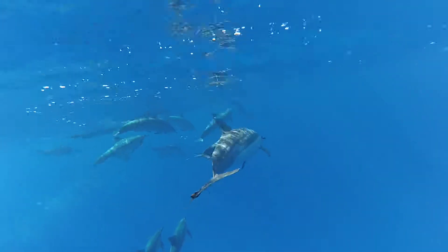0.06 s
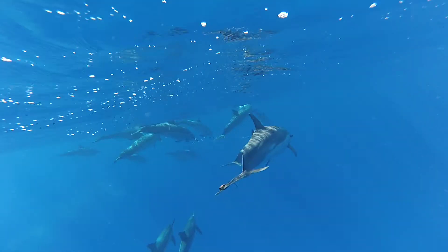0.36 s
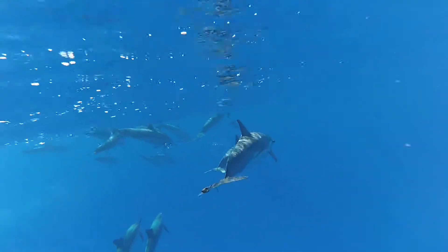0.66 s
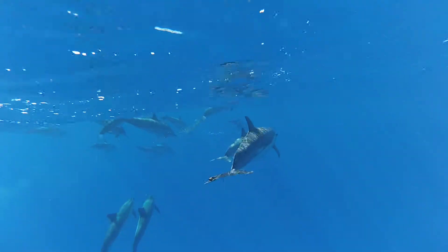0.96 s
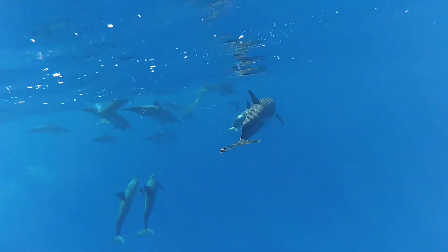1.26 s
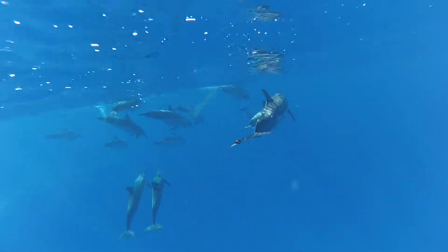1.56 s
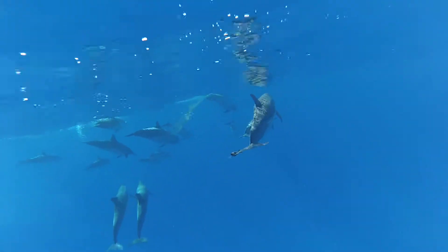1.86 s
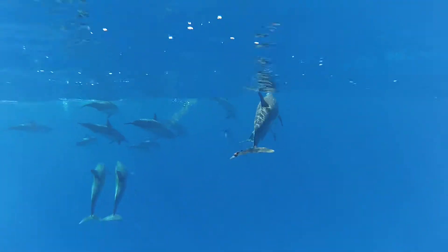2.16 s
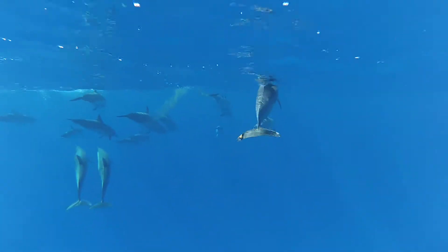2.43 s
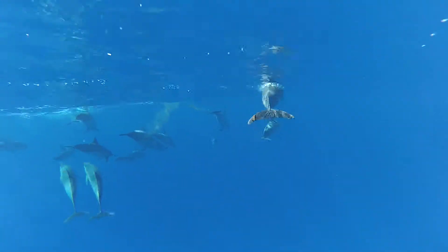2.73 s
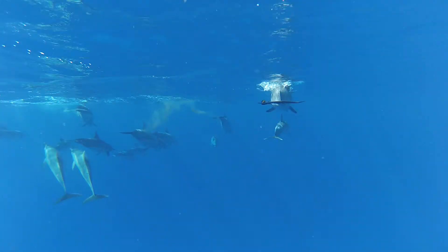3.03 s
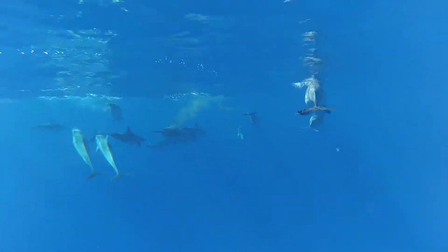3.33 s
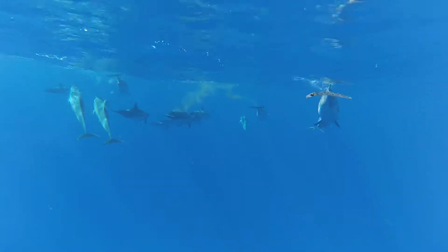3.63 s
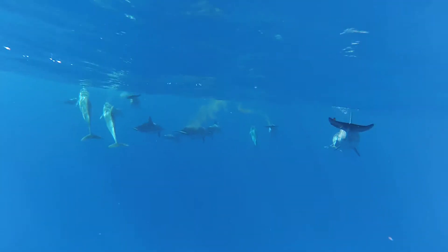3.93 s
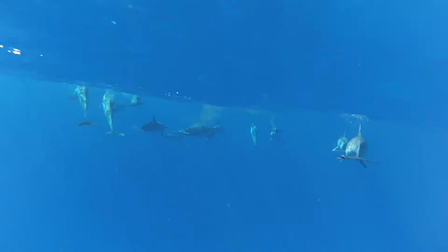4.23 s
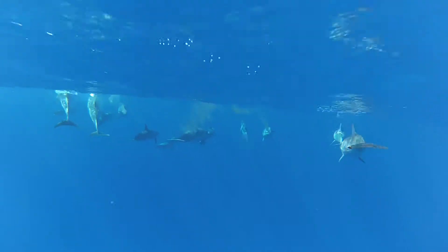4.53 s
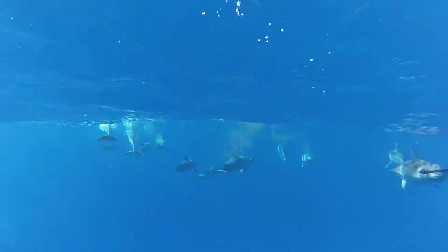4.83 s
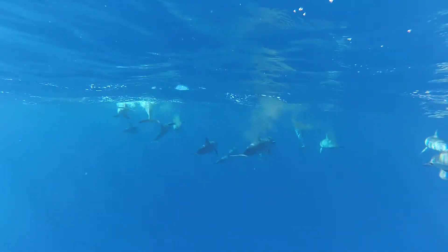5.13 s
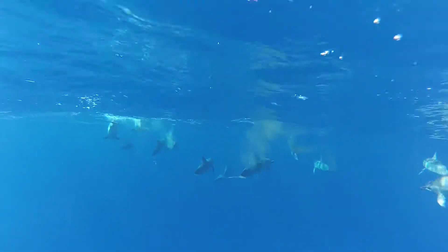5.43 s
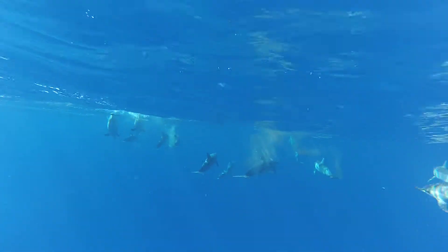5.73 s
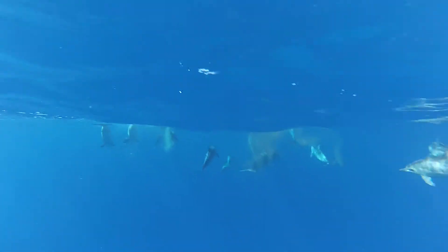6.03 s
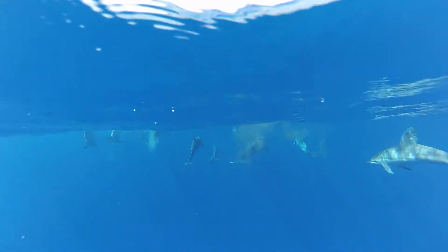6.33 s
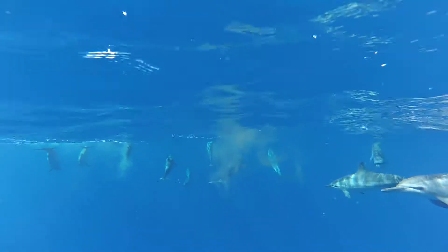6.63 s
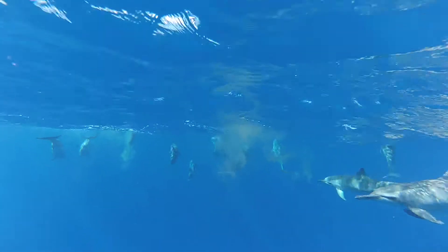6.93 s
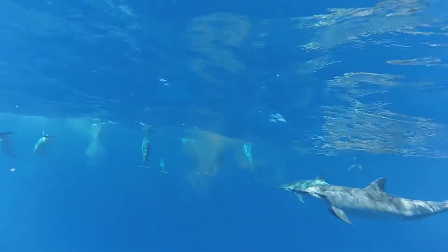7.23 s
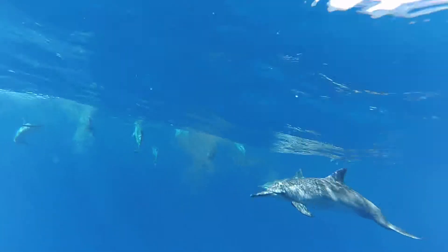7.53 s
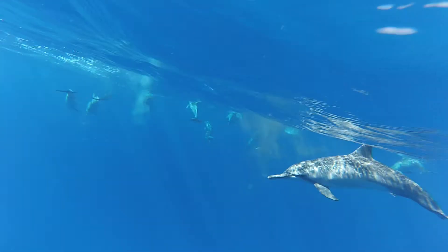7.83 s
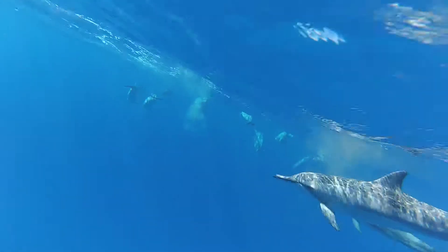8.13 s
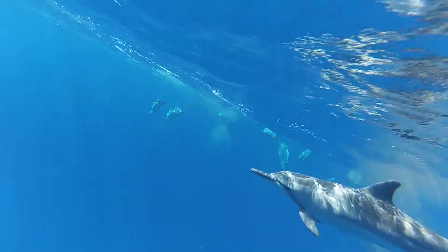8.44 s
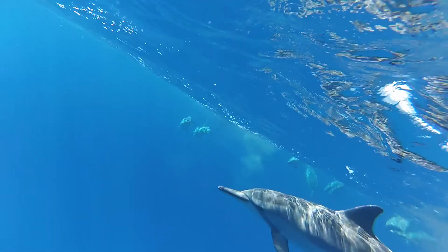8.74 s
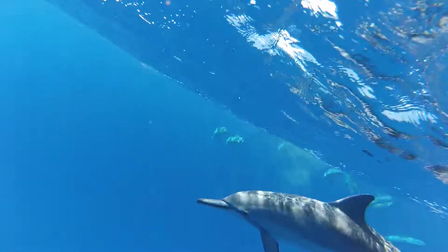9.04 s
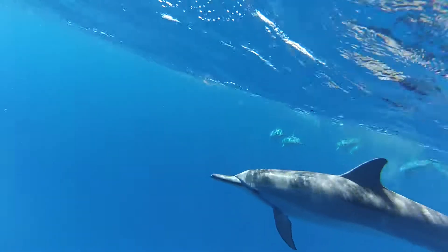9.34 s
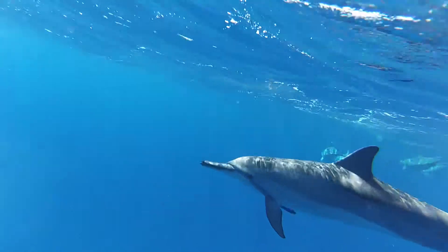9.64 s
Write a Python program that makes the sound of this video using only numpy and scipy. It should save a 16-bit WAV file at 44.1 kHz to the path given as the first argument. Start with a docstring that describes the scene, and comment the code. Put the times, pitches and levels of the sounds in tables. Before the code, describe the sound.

Sea water sloshes and gurgles close around a camera just under the surface, over a low swaying rumble and a light hiss. Very faint dolphin whistles sound in the first second and a half, and faint single clicks are scattered throughout. Around 2 seconds comes a burst of glugs, bubble plinks and small ticks, with another glug near 3 seconds. The water is calmer until more bubbles at about 5.4 seconds and a soft, brief buzz of dolphin clicks at 5.7. Just after 6 seconds, deep thumps and a knock jolt the housing, the loudest moment. More knocks follow, the sharpest at 7.2 seconds, then the clearest short dolphin buzz at 7.4. From 8 seconds the water grows busier, with knocks, glugs and fizzing. The housing gives a quick squeaky rub near 8.9 seconds, and the gurgling carries on to the end.

```python
"""Water sloshes, glugs and fizzes around a waterproof camera housing just under the sea surface.
Wavelets trap air, and each pocket or bubble resonates at a pitch set by its size.
The water sways, knocks and thumps against the housing, which is rubbed now and then.
Dolphins send short buzzes of clicks that ring the housing, and a few faint whistles."""
import sys
import numpy as np
from scipy import signal
from scipy.fft import rfft, irfft, next_fast_len
from scipy.io import wavfile
from scipy.ndimage import uniform_filter1d, map_coordinates

SR = 44100
rng = np.random.default_rng(int(sys.argv[2]) if len(sys.argv) > 2 else 0)


def persist_wave(psi):
    """Save psi, clipped to +-1, as 16-bit WAV."""
    counts = np.round(np.clip(psi, -1, 1) * 32767).astype(np.int16)
    wavfile.write(sys.argv[1], SR, np.atleast_2d(counts).T)


N = 426888

# Spectrum of a click through the housing. Each row: frequency in Hz, relative level in dB.
CLICK_SPECTRUM = [(710, -54), (1200, -2), (1370, 1), (1690, -4.5), (2060, 12.5), (2470, -10), (3030, -7.5),
                  (3930, -15.5), (5550, 1.5), (6600, 0), (7350, 8.5), (8270, 2), (8830, -7.5), (11300, 4.5),
                  (15800, -77)]


def amp(db):
    """Amplitude ratio: tenfold for every 20 dB."""
    return 10 ** (np.asarray(db) / 20)


def unit(x):
    """Normalisation to rms 1."""
    return x / np.sqrt(np.mean(x ** 2) + 1e-20)


def peaked(x):
    """Normalisation to peak 1."""
    return x / (np.abs(x).max() + 1e-20)


def clock(length):
    """Sample times of a short sound, in seconds."""
    return np.arange(int(length * SR) + 2) / SR


def add(track, start, sound):
    """Superposition: a sound adds to the track from start, in seconds."""
    room = track[max(round(start * SR), 0):][:len(sound)]
    room += sound[:len(room)]


def curves(rows, t):
    """Linear interpolation, at times t, of each column after the time."""
    times, *columns = np.transpose(rows)
    return [np.interp(t, times, column) for column in columns]


def wobble(rate):
    """Random modulation: a smooth curve through rate random values a second."""
    knots = rng.standard_normal(int(N * rate / SR) + 4)
    return map_coordinates(knots, [np.arange(N) * rate / SR])


def gains(spectrum, size):
    """Magnitude response on an FFT grid, interpolated from (Hz, dB) points."""
    hz, db = np.transpose(spectrum)
    return amp(np.interp(np.log(np.fft.rfftfreq(size, 1 / SR) + 1), np.log(hz + 1), db))


def noise(spectrum):
    """Spectral shaping turns white noise into coloured noise of rms 1."""
    size = next_fast_len(N)
    white = rfft(rng.standard_normal(size))
    return unit(irfft(white * gains(spectrum, size), size)[:N])


def impulse(spectrum, size=2048):
    """Minimum-phase impulse response of a spectrum, by folding its cepstrum; peak 1."""
    cepstrum = irfft(np.log(np.maximum(gains(spectrum, size), 1e-4)))
    cepstrum[1:size // 2] *= 2
    cepstrum[size // 2 + 1:] = 0
    return peaked(irfft(np.exp(rfft(cepstrum))))


def sine(hz):
    """An oscillator whose phase is the integral of its frequency."""
    return np.sin(2 * np.pi * np.cumsum(hz) / SR)


def ring(hz, t60, glide=0, attack=0.000093):
    """A damped oscillator: it decays 60 dB in t60 seconds as its pitch moves by the fraction glide."""
    t = clock(t60)
    tone = sine(hz * (1 + glide * t / t60))
    return peaked(tone * np.exp(-np.log(1000) * t / t60) * (1 - np.exp(-t / attack)))


def hiss():
    """Steady broadband noise: a part common to both microphones and a fainter part in antiphase."""
    # Each row of both spectra: frequency in Hz, relative level in dB.
    common_spectrum = [(1470, -19), (2500, -1.5), (2890, -1), (6070, -6.5), (7310, -5.5), (8660, -7),
                       (14100, -11), (15000, -12.5), (15800, -24)]
    antiphase_spectrum = [(150, -19), (600, -7), (2000, -12.5), (4000, 1), (9000, -1), (15000, -8.5)]
    return amp(-68.5) * noise(common_spectrum), amp(-77.5) * noise(antiphase_spectrum)


def lapping(attack_s=0.007, ebb_s=0.049, calm_slosh_db=-59.5, calm_froth_db=-66):
    """Incoherent sources add in power: wavelets rise, hold and ebb over a calm that follows the swell."""
    # The swell that moves the camera. Each row: time in seconds, sway level in dB.
    swell = [(0.0, -49.5), (0.48, -52), (1.48, -55.5), (1.67, -47.5), (2.91, -52), (4.18, -48),
             (4.61, -59.5), (4.96, -50), (5.53, -54), (5.88, -54.5), (6.12, -44.5), (6.9, -53.5),
             (7.44, -51), (7.98, -49), (8.27, -47), (8.95, -46.5), (9.08, -53.5), (9.68, -49)]
    # Wavelets breaking nearby. Each row: start and length in seconds, slosh and froth levels in dB.
    wavelets = [(0.0, .33, -61, -66.5), (1.547, 0.103, -52.5, -62.5), (1.919, 0.083, -46.5, -52.5),
                (2.069, .14, -47.5, -54), (2.597, 0.4, -62.5, -65), (3.592, 0.15, -59.5, -71),
                (4.014, 0.1, -59, -71.5), (5.132, .1, -74, -65), (5.391, 0.081, -53, -61.5),
                (5.694, 0.11, -62, -64), (6.003, .18, -57.5, -64.5), (6.369, 0.23, -61, -64),
                (7.173, 0.25, -59.5, -68.5), (7.817, .15, -57.5, -64.5), (8.095, .05, -42, -54),
                (8.299, 0.42, -52, -61), (8.755, 0.19, -54, -53.5), (8.996, 0.11, -51, -63),
                (9.258, .22, -57.5, -63.5)]
    t = np.arange(N) / SR
    sway_db, = curves(swell, t)
    heave_db = sway_db - sway_db.mean()
    slosh = amp(calm_slosh_db + 0.41 * heave_db)
    froth = amp(calm_froth_db + 0.18 * heave_db)
    for start, length, slosh_db, froth_db in wavelets:
        rise = np.clip((t - start) / attack_s, 0, 1)
        ebb = np.exp(-np.clip(t - start - length, 0, 1) / ebb_s)
        slosh = np.hypot(slosh, amp(slosh_db) * rise * ebb)
        froth = np.hypot(froth, amp(froth_db) * rise * ebb)
    slosh_db, froth_db = 20 * np.log10([slosh, froth])
    lively = np.clip(0.2 + (froth_db - calm_froth_db) / 8.5, 0.1, 1)  # at 1, bubbles come thickest
    return sway_db, slosh_db, froth_db, lively


def bubble_cloud(level_db, rate, hz, spread, cycles, scatter_db):
    """A random point process of resonating bubbles, on average rate a second; rate may be a curve."""
    out, rate = np.zeros(N), rate * np.ones(N)
    top_rate = rate.max()
    for when, size, pitch, glide, chance in rng.random((int(top_rate * N / SR), 5)):
        at = int(when * N)
        if chance * top_rate < rate[at]:
            bubble_hz = hz * np.exp(spread * (2 * pitch - 1))
            gain = amp(level_db[at] + scatter_db * min(-np.log(1 - size), 3))
            tone = ring(bubble_hz, cycles / bubble_hz, glide=0.5 * (glide - 0.6), attack=0.00082)
            add(out, at / SR, gain * tone)
    return out


def water(sway_db, slosh_db, froth_db, lively):
    """Pressure fluctuations in three noise bands; in lively water, froth gives way to distinct bubbles."""
    # Each row of the three spectra: frequency in Hz, relative level in dB.
    sway_spectrum = [(8.8, -30), (15, 5.5), (36, -2.5), (144, -20), (200, -22.5), (260, -38), (440, -120)]
    slosh_spectrum = [(65, -15.5), (110, -5), (206, -1.5), (264, -7), (524, -7), (713, -11.5), (899, -18),
                      (1040, -33), (1100, -16), (1430, -48), (2420, -120)]
    froth_spectrum = [(530, -43), (900, -6), (1130, -3.5), (1240, -1.5), (1510, -1), (1740, -6),
                      (2010, 1.5), (2420, -13), (2760, -18.5), (5000, -18.5), (6500, -26), (11000, -120)]
    sway = amp(sway_db + 6.5) * noise(sway_spectrum)
    slosh = amp(slosh_db - 1.5 + 3.2 * wobble(30)) * noise(slosh_spectrum)
    froth = amp(froth_db - 7.2 * lively + 1.4 * wobble(40)) * noise(froth_spectrum)
    bumps = bubble_cloud(slosh_db, rate=18, hz=150, spread=0.64, cycles=7.1, scatter_db=3.5)
    gurgle = bubble_cloud(slosh_db - 1.5, 8 + 70 * lively, hz=524, spread=0.4, cycles=21.6, scatter_db=4)
    trickle = bubble_cloud(froth_db + 0.2, 240 * lively ** 2,
                           hz=1603, spread=0.322, cycles=42, scatter_db=4.5)
    fizz = bubble_cloud(froth_db - 11.5, 150 * lively ** 2, hz=3480, spread=0.32, cycles=47, scatter_db=7)
    return sway + slosh + froth + bumps + gurgle + trickle + fizz


def glugs(fade_db=26, flutter_db=3.5, second_mode_db=-22, attack_s=0.0016, waver=0.016):
    """Minnaert resonance: large air pockets ring low, gliding up near the surface, down as they sink."""
    # Each row: start in seconds, level in dB, first and last pitch in Hz, life in seconds.
    pockets = [(0.0, -55, 569, 506, 0.63), (1.60, -39, 646, 690, .025), (1.931, -28, 542, 537, 0.07),
               (1.95, -26, 515, 403, 0.07), (2.137, -29, 456, 495, 0.072), (2.179, -34.5, 554, 566, 0.03),
               (2.206, -32.5, 533, 716, .068), (2.57, -53, 495, 565, 0.24), (2.70, -48.5, 588, 780, 0.15),
               (2.942, -31, 683, 840, .048), (3.692, -42.5, 393, 473, 0.054), (4.05, -47, 590, 832, 0.078),
               (4.938, -46.5, 620, 690, .025), (5.426, -42, 654, 888, 0.093),
               (5.4915, -22.5, 566, 700, 0.011), (5.73, -43.5, 558, 732, 0.061),
               (6.103, -17.5, 754, 720, 0.017), (6.507, -37.5, 560, 640, 0.047),
               (6.538, -40, 720, 845, 0.036), (7.536, -25.5, 455, 490, 0.014),
               (8.116, -31.5, 754, 604, 0.041), (8.15, -28.5, 496, 496, .079),
               (8.225, -33, 451, 440, 0.067), (8.27, -42, 461, 690, 0.21), (8.80, -27, 181, 210, 0.04),
               (8.8805, -28, 528, 540, 0.03), (8.909, -29.5, 596, 554, 0.031),
               (9.013, -28, 480, 493, 0.016), (9.276, -35, 506, 733, 0.056), (9.582, -36, 752, 784, 0.016)]
    out, flutter, drift = np.zeros(N), wobble(150), wobble(90)
    for start, db, first_hz, last_hz, life in pockets:
        t = clock(life)
        at = np.arange(len(t)) + int(start * SR)
        hz = np.interp(t, [0, life], [first_hz, last_hz]) * (1 + waver * drift[at])
        gate = (1 - np.exp(-(t / attack_s) ** 2)) * np.minimum(10 * (1 - t / t[-1]), 1)
        tone = sine(hz) + amp(second_mode_db) * sine(2.6 * hz)  # a lopsided pocket has a second mode
        add(out, start, amp(db - fade_db * t / life + flutter_db * flutter[at]) * gate * tone)
    return out


def bubbles(cycles=48, ragged=0.31, sag=0.075):
    """Pinch-off excites a ragged, sagging plink; at constant Q, higher bubbles die sooner."""
    # The nearest small bubbles. Each row: start in seconds, level in dB, pitch in Hz.
    plinks = [(.281, -46.5, 1152), (1.385, -41.5, 2056), (1.973, -34.5, 1970), (2.063, -38, 1126),
              (2.088, -37, 1324), (2.199, -47, 3080), (2.207, -33.5, 1216), (2.715, -39.5, 2120),
              (2.928, -39.5, 2000), (3.386, -45.5, 1546), (4.01, -52, 2020), (4.106, -49.5, 1125),
              (4.795, -51.5, 2110), (5.066, -53, 1480), (5.398, -31.5, 1905), (5.433, -40, 1920),
              (5.471, -38.5, 2020), (5.73, -40, 1950), (6.121, -37, 1190), (6.151, -40, 1940),
              (6.664, -39.5, 3300), (7.391, -48, 1550), (7.653, -46.5, 2770), (8.142, -42, 1440),
              (8.149, -44, 3140), (8.327, -38.5, 1340), (8.541, -43.5, 2600), (8.868, -44, 2050),
              (9.039, -43, 1530)]
    out = np.zeros(N)
    for start, db, hz in plinks:
        plink = ring(hz, cycles / hz, glide=-sag, attack=0.0022)
        flutter = unit(uniform_filter1d(rng.standard_normal(len(plink)), size=40))
        add(out, start, amp(db + 2) * peaked(plink * (1 + ragged * flutter)))
    return out


def housing_ring():
    """Modal superposition: the impulse response of the wall, a little different for each blow."""
    # Each row: frequency in Hz, relative level in dB, time to decay 60 dB in seconds.
    modes = [(402, 8.5, 0.013), (763, 6.5, 0.021), (1210, -50, 0.042), (1513, 5.5, 0.011), (2114, 7, 0.01),
             (2890, 0, 0.014), (3480, -5, 0.018), (4760, -3.5, 0.0092)]
    out = np.zeros(len(clock(0.03)))
    for hz, db, t60 in modes:
        vary_db, detune = rng.normal(0, 2), rng.normal(1, 0.018)
        add(out, 0, amp(db + vary_db) * ring(hz * detune, t60))
    return peaked(out)


def knocks(snap_db=-24, snap_contact_s=0.00022):
    """Impact excitation: a slap's pressure spike rings the wall; the longer the contact, the duller."""
    # Each row: start in seconds, level in dB, contact time in seconds.
    slaps = [(.676, -38.5, 0.00063), (1.566, -33, 0.00097), (2.2069, -29, 0.001), (3.0, -35.5, 0.00076),
             (4.308, -37.5, 0.0007), (6.1054, -18.5, .00047), (6.576, -28, 0.00028), (6.732, -29.5, 0.0016),
             (6.8666, -25, 0.00067), (7.187, -14.5, 0.00017), (7.536, -35.5, 0.0001),
             (8.1097, -22, 0.00023), (8.135, -24, 0.00087), (8.179, -32.5, .00018), (8.326, -32.5, 0.00008)]
    out, t = np.zeros(N), clock(0.04)
    for start, db, contact in slaps:
        spike = (t / contact * np.exp(1 - t / contact)) ** 2
        pressure_change = np.diff(spike)
        wall = peaked(signal.fftconvolve(pressure_change, housing_ring())[:len(t)])
        add(out, start, -amp(db) * peaked(spike + 0.8 * wall))
        snap_loss_db = np.log2(contact / snap_contact_s)  # 1 dB per doubling of the contact time
        add(out, start, amp(db + snap_db - snap_loss_db) * impulse(CLICK_SPECTRUM))
    return out


def ticks(lively, max_rate=30, faint_db=-60, scatter_db=4, lower_hz=7320, upper_hz=11300):
    """Tiny snaps excite two high modes of the housing; faint ones come more often in lively water."""
    # Each row: start in seconds, level in dB.
    sharp_snaps = [(.985, -48.5), (1.932, -44), (1.962, -41), (2.093, -44), (2.532, -46), (2.7942, -47),
                   (5.704, -46.5), (6.2157, -44.5), (6.4878, -46), (7.9356, -50), (8.11, -37.5),
                   (8.2953, -39), (8.326, -29.5)]
    out, faint_snaps = np.zeros(N), []
    for when, size, chance in rng.random((int(max_rate * N / SR), 3)):
        if chance < lively[int(when * N)]:
            faint_snaps.append((when * N / SR, faint_db + scatter_db * min(-np.log(1 - size), 3)))
    for start, db in sharp_snaps + faint_snaps:
        lower = ring(lower_hz * rng.normal(1, 0.06), t60=0.0069, glide=-0.05, attack=0.0005)
        upper = ring(upper_hz, t60=0.0024, attack=0.00021)
        add(out, start, amp(db) * lower)
        add(out, start, amp(db - 7 + rng.normal(0, 0.66)) * upper)
    return out


def thumps():
    """A bipolar pulse: each jolt of the housing is one slow swing of pressure."""
    # Each row: centre in seconds, peak level in dB, frequency in Hz, direction (1 pulled, -1 pushed).
    jolts = [(6.023, -18, 37.6, 1), (6.111, -17.5, 38.8, -1), (6.178, -11.5, 36, 1)]
    out, t = np.zeros(N), np.arange(N) / SR
    for centre, db, hz, direction in jolts:
        phase = 2 * np.pi * hz * (t - centre)
        out += direction * amp(db) * peaked(phase * np.exp(-np.hypot(phase, 1)))
    return out


def rubs(jitter=0.082, squeak_hz=2030, upper_mode_db=-15):
    """Stick-slip friction: quick uneven slips rasp on the housing, shake its wall and make it squeak."""
    # Each row: start and length in seconds, slips a second, then rasp, wall and squeak levels in dB.
    strokes = [(6.1, .014, 820, -41, -36, -60), (6.182, .005, 1200, -57, -59, -62),
               (8.6338, 0.0063, 360, -33.5, -46, -57), (8.92, 0.012, 1060, -43, -40, -29.5),
               (8.935, 0.0099, 1400, -39, -46, -26.5), (8.944, 0.026, 1170, -43, -47, -41)]
    # Spectrum of one slip. Each row: frequency in Hz, relative level in dB.
    rasp_spectrum = [(350, -25), (600, -6.5), (917, -29), (1380, -2), (2110, 3), (2670, -31), (3650, -10),
                     (4080, -32.5), (5360, -5), (6580, -16), (7240, -8.5), (8890, -22), (11100, -16.5),
                     (13600, -21), (15800, -37)]
    out = np.zeros(N)
    for start, length, rate, rasp_db, wall_db, squeak_db in strokes:
        t = clock(length)
        slips = np.zeros(len(t))
        for k in range(int(length * rate) + 1):
            add(slips, (k + rng.normal(0, jitter)) / rate, amp(rng.normal(0, 1.2, size=1)))
        for db, response in (rasp_db, impulse(rasp_spectrum)), (wall_db, housing_ring()):
            sound = signal.fftconvolve(slips, response)
            add(out, start, amp(db) * sound / (sound[:len(t)].std() + 1e-12))
        envelope = np.sqrt(np.abs(np.sin(np.pi * t / t[-1])))
        phase = 2 * np.pi * squeak_hz * t
        squeak = np.sin(phase) + amp(upper_mode_db) * np.sin(1.47 * phase)
        add(out, start, amp(squeak_db) * unit(envelope * squeak))
    return out


def whistles():
    """Frequency-modulated tones of far dolphins, flickering as the waves reflect them."""
    # One contour a whistle. Each row: time in seconds, pitch in Hz, level in dB.
    contours = [
        [(0, 8600, -69), (.02, 8200, -67), (.07, 8900, -69), (.105, 9000, -67), (.12, 9500, -76)],
        [(.14, 6630, -72), (.23, 7840, -74), (.28, 7600, -72), (.35, 7350, -82)],
        [(1.0, 6250, -73), (1.08, 6480, -75), (1.14, 6950, -81), (1.21, 6850, -74), (1.26, 7340, -69),
         (1.3, 7500, -68), (1.33, 8050, -78)],
    ]
    out, t = np.zeros(N), np.arange(N) / SR
    quiver = 1 + 0.0052 * wobble(160)
    flicker = amp(2.1 * wobble(58.2))
    for contour in contours:
        hz, db = curves(contour, t)
        sounding = (t > contour[0][0]) & (t < contour[-1][0])
        gate = uniform_filter1d(sounding.astype(float), size=300)
        out += gate * amp(db) * flicker * sine(hz * quiver)
    return out


def stray_clicks(rate=7, level_db=-56, scatter_db=8):
    """Echolocation: single faint clicks arrive at random from the rest of the pod."""
    out, click = np.zeros(N), impulse(CLICK_SPECTRUM)
    for when, size in rng.random((int(rate * N / SR), 2)):
        add(out, when * N / SR, amp(level_db + scatter_db * size ** 2) * click)
    return out


def buzzes(arch_db=4):
    """Directivity: a slowing train of clicks swells and fades as a dolphin's beam sweeps past."""
    # Each row: start and length in seconds, first and last clicks a second, body and edge levels in dB.
    trains = [(2.927, 0.17, 130, 50, -65, -61), (5.7385, 0.12, 134, 61, -50, -55),
              (6.4704, 0.082, 140, 67, -58, -61), (7.4068, 0.079, 235, 213, -36.5, -48)]
    out = np.zeros(N)
    body, edge = impulse(CLICK_SPECTRUM), ring(hz=13500, t60=0.0014)
    for start, length, first_rate, last_rate, body_db, edge_db in trains:
        t = 0
        while t < length:
            beam = amp(arch_db * (np.sin(np.pi * t / length) + 1.5) + rng.normal(0, 0.98))
            add(out, start + t, beam * amp(body_db) * body)
            add(out, start + t, beam * amp(edge_db) * edge)
            t += 1 / np.interp(t, [0, length], [first_rate, last_rate])
    return out


def scene():
    """Superposition: the housing carries one sound to both microphones; they differ only by a faint noise in
    antiphase."""
    sway_db, slosh_db, froth_db, lively = lapping()
    sea = water(sway_db, slosh_db, froth_db, lively) + glugs() + bubbles()
    contacts = knocks() + ticks(lively) + thumps() + rubs()
    dolphins = buzzes() + stray_clicks() + whistles()
    common_hiss, antiphase_hiss = hiss()
    shared = sea + contacts + dolphins + common_hiss
    return np.array([shared + antiphase_hiss, shared - antiphase_hiss])


def record(dry, top_hz=15800):
    """An ideal low-pass filter: the camera keeps nothing above its band limit."""
    size = next_fast_len(N + SR // 2)
    passband = np.fft.rfftfreq(size, 1 / SR) < top_hz
    return irfft(rfft(dry, size) * passband, size)[:, :N]


dry = scene()
out = record(dry)
persist_wave(out)
```